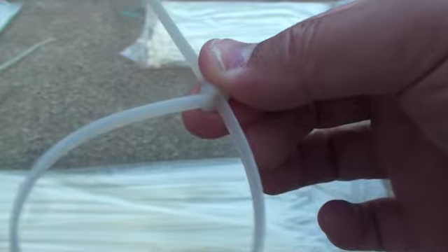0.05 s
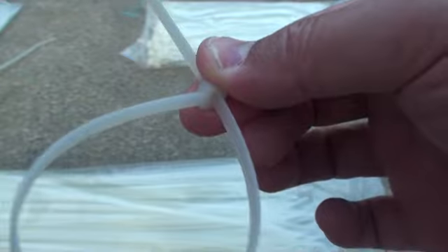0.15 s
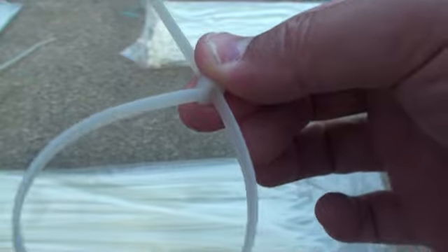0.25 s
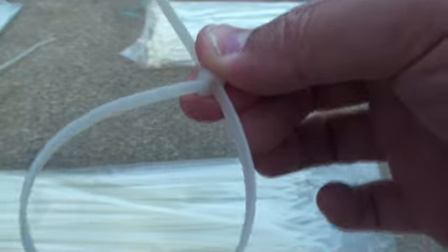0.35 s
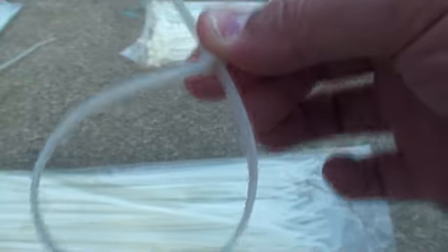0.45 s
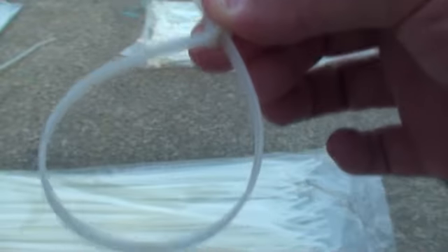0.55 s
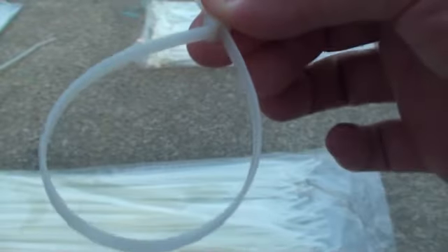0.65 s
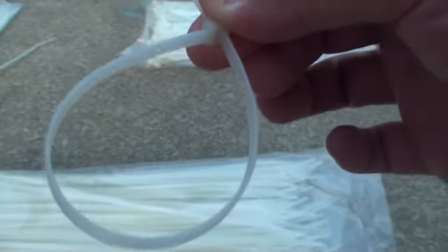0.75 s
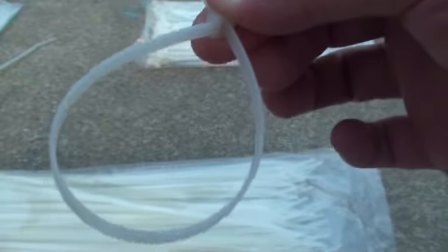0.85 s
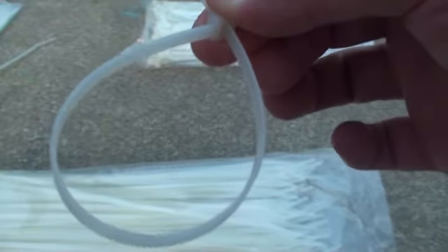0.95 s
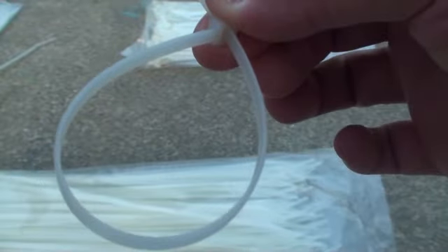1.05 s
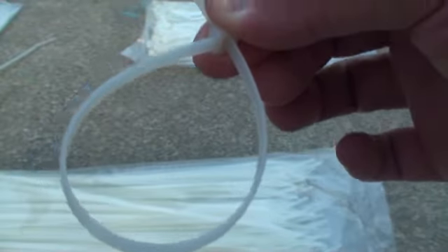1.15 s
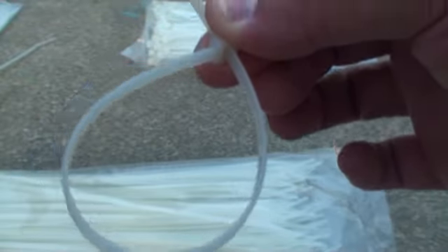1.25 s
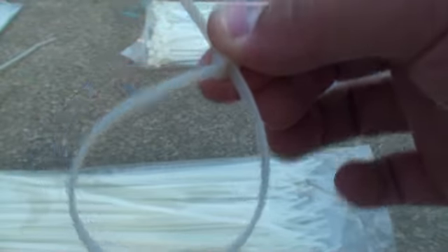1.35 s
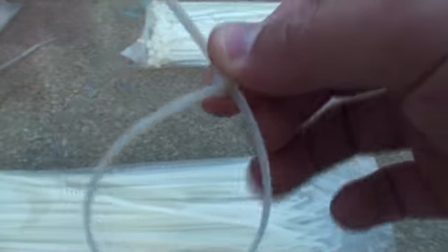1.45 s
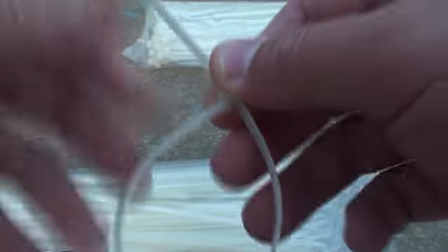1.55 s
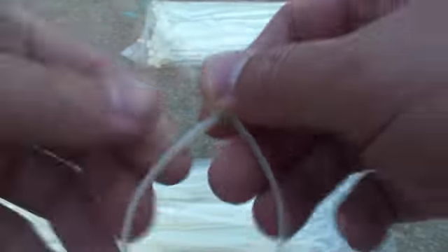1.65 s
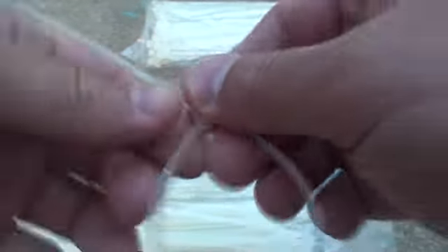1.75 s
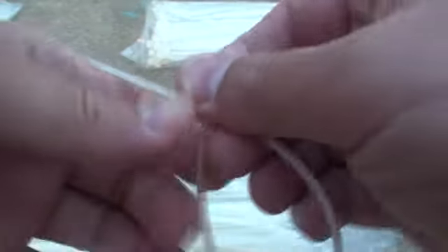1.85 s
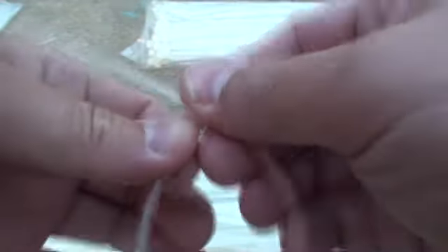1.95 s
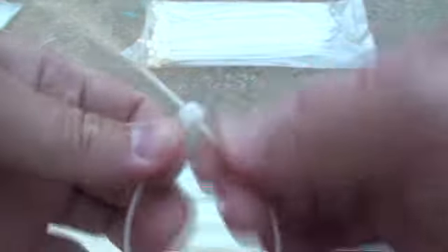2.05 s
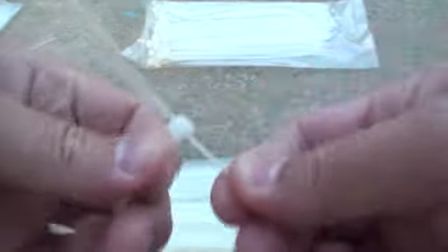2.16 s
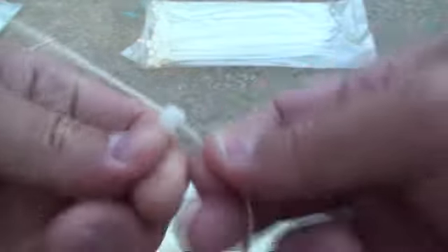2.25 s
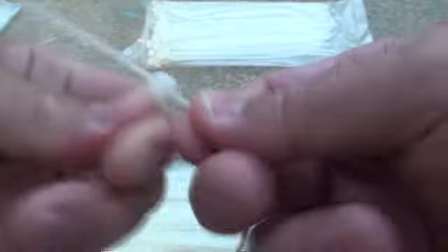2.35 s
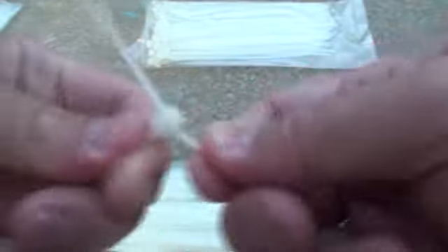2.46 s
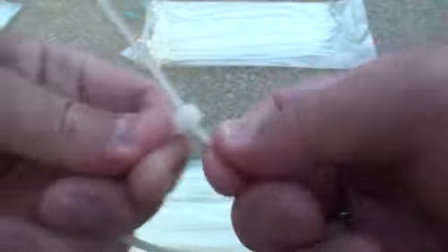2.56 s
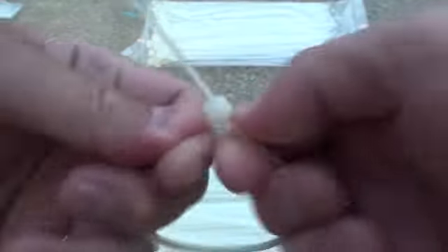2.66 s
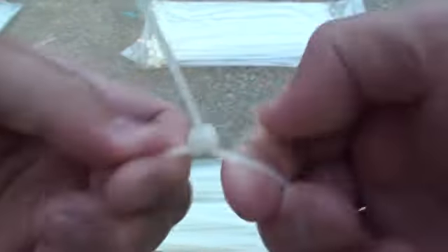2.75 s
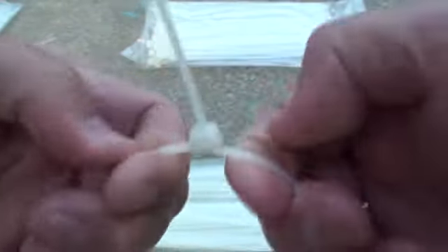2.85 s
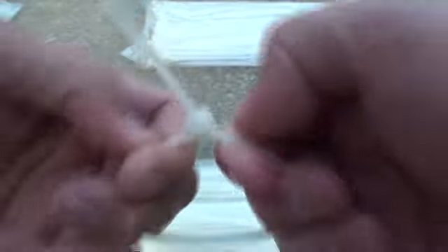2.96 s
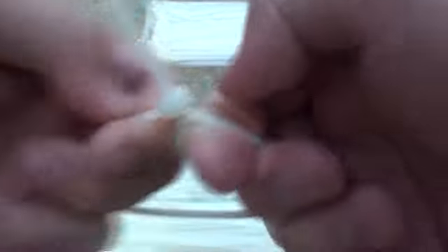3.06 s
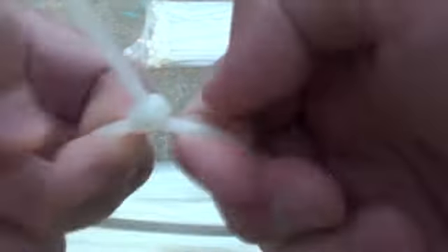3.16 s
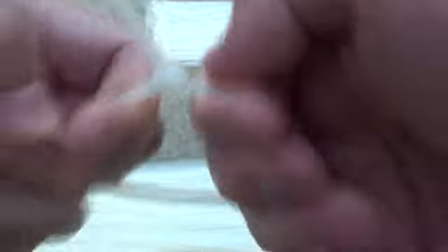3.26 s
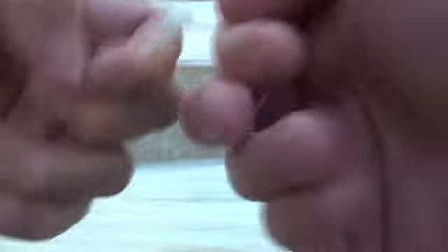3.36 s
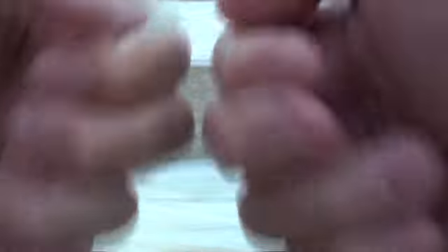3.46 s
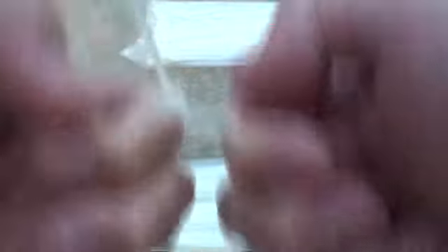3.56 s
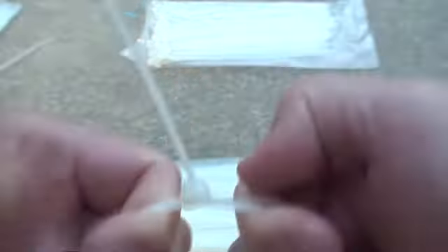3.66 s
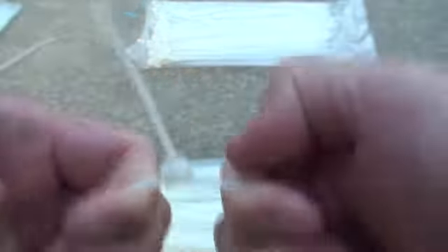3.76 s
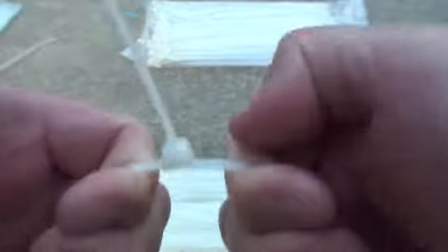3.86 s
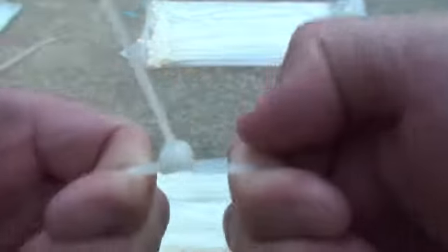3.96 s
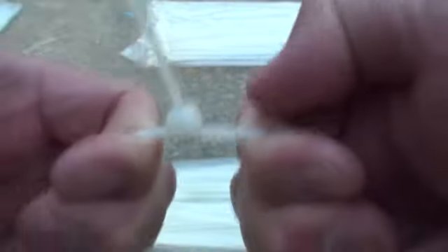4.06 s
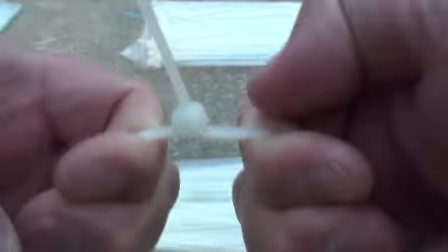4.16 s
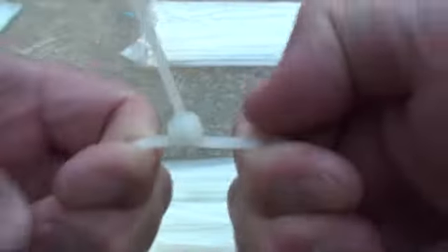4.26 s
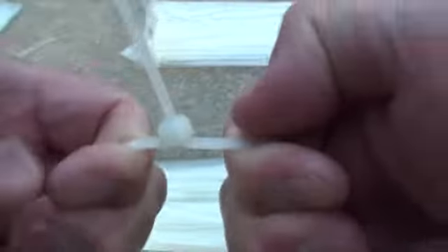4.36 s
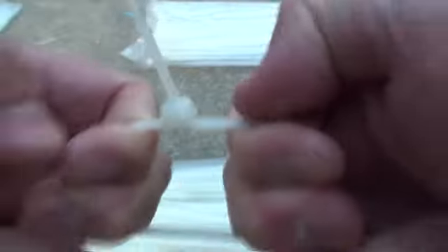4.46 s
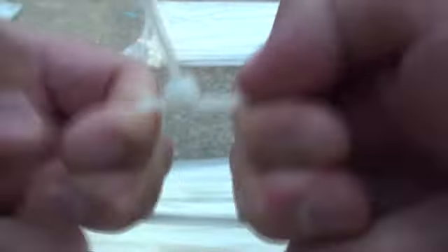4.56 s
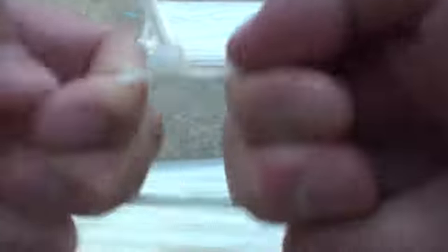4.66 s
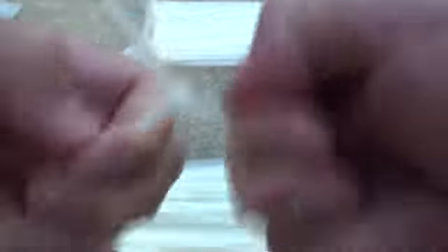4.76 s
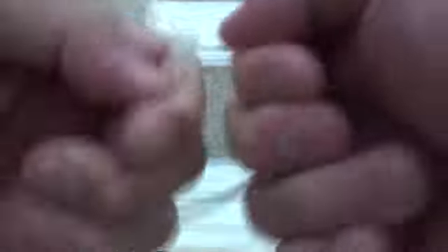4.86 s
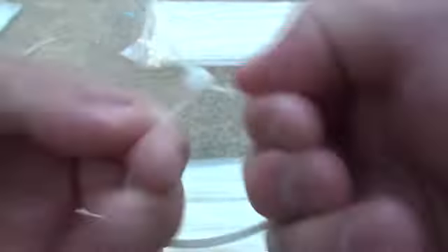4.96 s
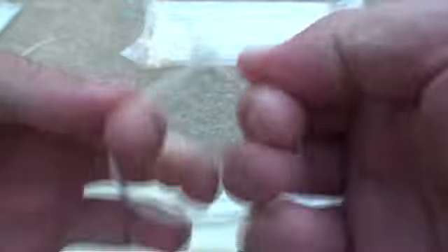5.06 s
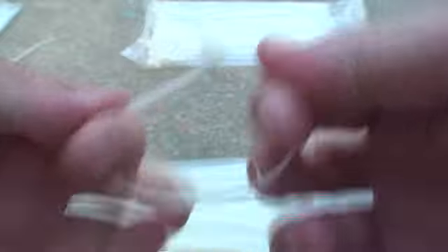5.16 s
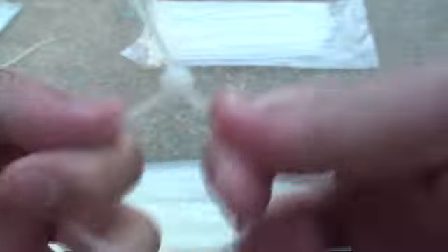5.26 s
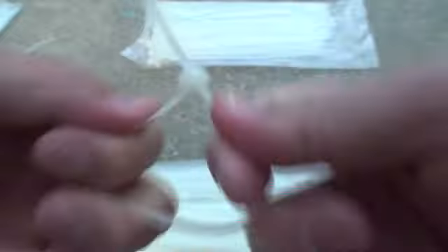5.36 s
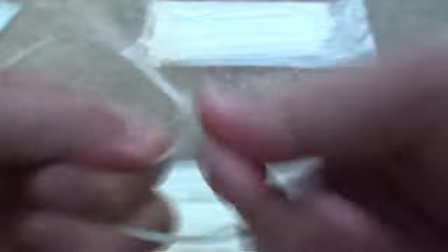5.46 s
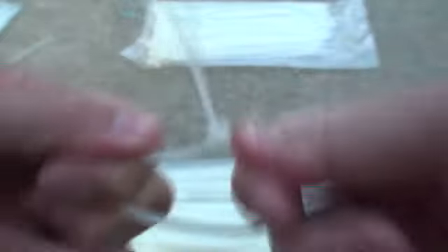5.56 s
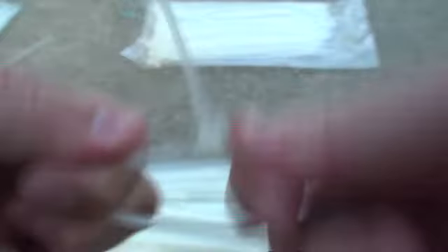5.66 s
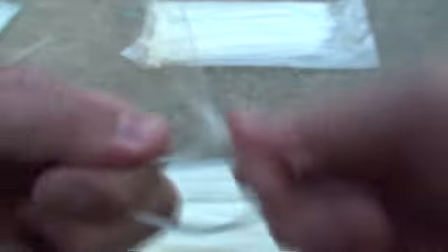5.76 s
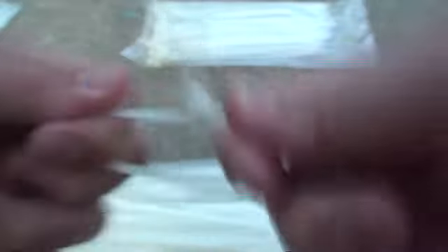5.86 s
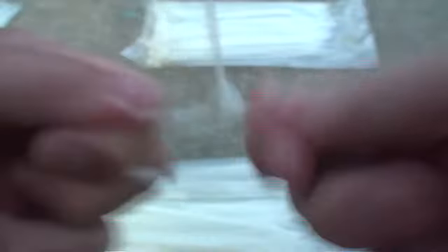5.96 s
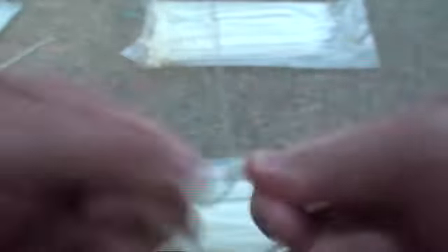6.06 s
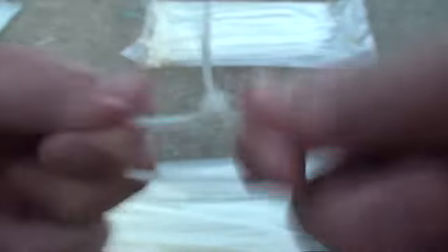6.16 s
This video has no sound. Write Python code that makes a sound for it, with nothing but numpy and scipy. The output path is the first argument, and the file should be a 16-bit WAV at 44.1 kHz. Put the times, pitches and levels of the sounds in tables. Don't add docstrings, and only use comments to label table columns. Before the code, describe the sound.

Sharp ratcheting clicks of a nylon strap dominate the first second and a half, each with a tiny rattle and a faint open-air tail. A final rapid burst comes after a gap. Then come quiet skin rustles, nail ticks, dull bumps and one bright click late on. Behind lie a steady low hum, soft traffic rumble, faint dove coos and thin bird whistles in a quiet yard, captured close in stereo.

```python
import sys
import numpy as np
from scipy import signal
from scipy.fft import rfft, irfft, next_fast_len
from scipy.io import wavfile
from scipy.ndimage import uniform_filter1d

SR = 44100
rng = np.random.default_rng(int(sys.argv[2]) if len(sys.argv) > 2 else 0)


def elevation(decibels):
    levels = np.asarray(decibels, float)
    return 10 ** (levels / 20)


def wav_record(signal):
    frames = np.transpose(np.atleast_2d(signal))
    bounded = np.clip(frames, -1, 1)
    quanta = np.round(bounded * 32767).astype(np.int16)
    wavfile.write(sys.argv[1], SR, quanta)


N = 273861
T = np.arange(N) / SR


def colour(points, size, stretch=1.):
    hz, db = np.transpose(points)
    bin_hz = np.maximum(np.arange(size // 2 + 1) * SR / size, 1)
    log_gain = np.interp(np.log(bin_hz), np.log(hz * stretch), db) * np.log(10) / 20
    cepstrum = irfft(log_gain, size)
    cepstrum[1:size // 2] *= 2
    cepstrum[size // 2 + 1:] = 0
    return np.exp(rfft(cepstrum))


def unit(x):
    return x / np.sqrt(np.mean(x ** 2))


def band(x, hz, width_hz):
    edges_hz = np.clip([hz - width_hz / 2, hz + width_hz / 2], 20, .45 * SR)
    return signal.sosfilt(signal.butter(2, edges_hz, "bandpass", fs=SR, output="sos"), x)


def walk(rate_hz, size=N):
    hold = int(SR / rate_hz)
    steps = np.repeat(rng.standard_normal(size // hold + 1), hold)
    return 1.6 * uniform_filter1d(uniform_filter1d(steps, hold), hold)[:size]


def fade(t60_s, size):
    return np.exp(-np.log(1000) * np.arange(size) / SR / t60_s)


def stereo(mid, side, side_db=0):
    return mid + elevation(side_db) * np.outer([1, -1], side)


def add(out, s, sound):
    i = int(round(s * SR))
    part = out[:, max(i, 0):i + sound.shape[-1]]
    part += sound[..., max(-i, 0):][..., :part.shape[-1]]


def teeth():
    # time_s, teeth_passed
    strap_travel = [
        [(-.0008, 0), (.0312, 2), (.048, 3), (.0684, 4), (.1137, 6), (.1873, 9), (.2141, 10), (.272, 12),
         (.3064, 13)],
        [(.4287, 0), (.4473, 1), (.4648, 2), (.4838, 3)],
        [(.8043, 0), (.8417, 1), (.8589, 2), (.9031, 5), (.9205, 6), (.9405, 7)],
        [(1.1333, 0), (1.1555, 1), (1.1893, 3)],
        [(1.3029, 0), (1.316, 1), (1.3527, 4), (1.3674, 5)],
        [(2.4112, 0), (2.4239, 2), (2.4372, 3), (2.4562, 5), (2.4667, 6), (2.4794, 7)],
    ]
    snaps = []
    for pull, path in enumerate(strap_travel):
        time_s, passed = np.transpose(path)
        for tooth in range(path[-1][1] + 1):
            snaps.append((pull, np.interp(tooth, passed, time_s)))
    return snaps


def ratchet():
    # tooth_peak_db, brightness_hz
    pull_settings = [(-4.8, 10050), (-4.9, 10170), (-4.2, 10500), (-4.7, 10180), (-4.7, 10140),
                     (-4.8, 9510)]
    # landing_ms, seating_ms, rebound_ms
    grip_blows_ms = [(.355, .47, .595), (.36, .47, .65), (.35, .528, .665), (.35, .52, .70),
                     (.355, .52, .66), (.14, .225, .37)]
    grip_blow_sizes = [(-1.0, -1.2, 1.0), (-.9, -1.6, -.7), (-.65, 1.2, -.55), (-1.0, 1.4, .6),
                       (-1.1, 1.5, -.6), (1.5, -.6, .3)]
    head_knocks_db = [1.5, 2, -2, -1.5, -1, -2]
    # freq_hz, level_db
    pawl_response = [(2500, -36), (4000, -38), (4800, -11.5), (5600, -7), (7500, -8), (9800, -1.5),
                     (12000, -1), (14000, -12), (15800, -13.5), (16900, -32)]
    # freq_hz, level_db
    pinched_response = [(2500, -34), (4000, -9), (5600, -15), (6800, -7), (8000, -2.5), (9800, 3),
                        (12000, 4.5), (14000, -10), (15800, -12), (16900, -27.5)]
    # freq_hz, level_db
    head_response = [(200, -44.5), (400, -16), (1000, -18), (1600, -17.5), (2300, -12.5), (3100, -19.5),
                     (4100, -16.5), (4800, -14.5), (6000, -31), (12000, -50)]
    # delay_ms, level_db
    palm_echoes = [(1.25, -36), (1.8, -10), (2.2, -9), (3.1, -22.5), (4.2, -27.5)]
    strap_db, strap_t60_s, strap_side_db = -24, 0.013, -10.5
    yard_db, yard_t60_s = -36.5, .16
    scatter_db, scatter_hz, scatter_ms = .7, 150, np.array([.006, .008, .025])

    out, size = np.zeros((2, N)), 4096
    phase_per_ms = -2j * np.pi * np.arange(size // 2 + 1) * SR / size / 1000
    rattles = rng.standard_normal((len(pull_settings), 2, size))
    onset = 1 - fade(0.0025, size)
    head = colour(head_response, size)
    for pull, s in teeth():
        chance = rng.standard_normal((3, 3))
        peak_db, bright_hz = pull_settings[pull] + chance[2, 1:] * (scatter_db, scatter_hz)
        blow_ms = grip_blows_ms[pull] + scatter_ms * chance[0]
        sizes = grip_blow_sizes[pull] * elevation(0.9 * chance[1])
        blows = 1 + sizes @ np.exp(np.outer(blow_ms, phase_per_ms))
        response = pinched_response if pull == len(pull_settings) - 1 else pawl_response
        pawl = colour(response, size, (bright_hz / 10000) ** 0.57)
        knock = elevation(head_knocks_db[pull] + 1.7 * chance[2, 0]) * np.exp(phase_per_ms * blow_ms[0]) * head

        path = np.zeros((2, size))
        path[:, 0] = elevation(3.0), elevation(1.5)
        for k, (ms, echo_db) in enumerate(palm_echoes):
            i = int(ms * SR / 1000)
            path[k % 2, i] += elevation(echo_db - 5)
            path[1 - k % 2, i + 1] += elevation(echo_db - 11.0)
        mid, side = 1.82 * rattles[pull] + 0.5 * rng.standard_normal((2, size))
        path += elevation(strap_db) * onset * fade(strap_t60_s, size) * stereo(mid, side, strap_side_db)
        yard = elevation(yard_db) * onset * fade(yard_t60_s, size) * rng.standard_normal((2, size))
        click = irfft((blows * pawl + knock) * rfft(path) + pawl * rfft(yard), size)
        add(out, s, click * elevation(peak_db - .2) / np.abs(click.mean(axis=0)).max())
    return out


def rubbing():
    # hardest_s, press_s, release_s, peak_db, tilt_db
    skin_strokes = [(1.86, 0.046, .16, -59, 0), (1.98, 0.12, .06, -58, 1.5), (2.086, .07, 0.014, -53.5, 3),
                    (2.2, 0.082, 0.067, -54.5, 1.5), (2.247, 0.092, 0.062, -45.5, -1),
                    (2.29, 0.057, 0.04, -60.5, 4), (2.502, 0.0065, 0.037, -49, 2),
                    (2.59, 0.25, .045, -58.5, 1.5), (2.8, 0.023, .12, -52, 0.5), (2.95, .03, .03, -64, -2),
                    (3.228, .08, .09, -66, -7), (3.49, 0.083, .07, -49, -1), (3.535, 0.052, 0.031, -46, 1),
                    (3.68, 0.18, .07, -55.5, -3.5), (3.926, 0.028, 0.064, -69, -10),
                    (4.99, .025, 0.22, -57, -1.5), (5.137, 0.024, .03, -57, 2.5),
                    (5.23, .05, .1, -53.5, 3.5), (5.3, 0.13, 0.03, -52, 1),
                    (5.636, 0.0067, 0.08, -50.5, 9.5), (5.69, .04, .035, -60, 5),
                    (6.006, 0.0069, 0.037, -47.5, -0.5), (6.045, .03, .015, -59, 4),
                    (6.16, .015, .05, -63, 4)]
    stroke_db, stroke_round = 17.5, 1.5
    dull_db, bright_db, focus = -1, 0, 0.16

    band_power = np.zeros((3, N))
    for s, press_s, release_s, peak_db, tilt_db in skin_strokes:
        away = np.where(T < s, (s - T) / press_s, (T - s) / release_s)
        db = peak_db - stroke_db * away ** stroke_round
        sink_db = focus * np.maximum(db + 73.5, 0)
        dull = db + dull_db - tilt_db - sink_db
        bright = db + bright_db + tilt_db - sink_db
        band_power += elevation([dull, db, bright]) ** 2
    grain_db = 2.0 * rng.exponential(size=N) + 1.8 * walk(150)
    grains = rng.standard_normal((2, N)) * elevation(grain_db)
    bands_hz = [(4600, 3000), (7500, 4200), (11200, 5600)]
    mid, side = sum(gain * unit(band(grains, *hz)) for gain, hz in zip(np.sqrt(band_power), bands_hz))
    low_pass = signal.ellip(6, .2, 50, 15600, fs=SR, output="sos")
    return signal.sosfilt(low_pass, stereo(mid, side, -20))


def ticking():
    # start_s, peak_db, centre_hz, width_hz, t60_ms
    nail_ticks = [(1.516, -40, 10600, 4000, 5.1), (1.974, -42, 4030, 5060, 20),
                  (2.077, -35, 5000, 8000, 26), (2.088, -36.5, 9000, 8000, 18),
                  (2.843, -38.5, 1800, 2000, 11), (2.909, -36, 4000, 5000, 5.5),
                  (3.049, -35, 1807, 3960, 6.4), (3.3452, -22, 3100, 4800, 4.8),
                  (3.347, -34.5, 4430, 6000, 17), (4.825, -36.5, 4970, 8800, 12),
                  (5.04, -43, 7000, 9000, 8), (5.269, -38.5, 8000, 8000, 25), (5.594, -42, 5000, 3000, 6.6),
                  (5.6136, -11, 12500, 6660, 17), (5.616, -27.5, 3520, 930, 6.9),
                  (5.615, -31, 8500, 2500, 8.6), (5.628, -29, 11400, 8000, 23),
                  (5.677, -28.5, 4100, 4070, 6.8), (6.005, -33, 2200, 3580, 24),
                  (6.017, -41, 5030, 7000, 18), (6.159, -39.5, 2500, 4000, 17),
                  (6.189, -42, 9000, 8000, 13)]
    out, size = np.zeros((2, N)), 2048
    for s, peak_db, hz, width_hz, t60_ms in nail_ticks:
        burst = rng.standard_normal((2, size)) * fade(t60_ms / 1000, size)
        mid, side = band(burst, hz, width_hz)
        add(out, s, elevation(peak_db) / np.abs(mid).max() * stereo(mid, side, -11))
    return out


def bumping():
    # start_s, peak_db, thud_hz, knock_hz, knock_db
    knuckle_bumps = [
        (5.4392, -32, 189, 1040, -0.5),
        (5.4625, -29, 181, 975, -3.5),
        (5.479, -37.5, 218, 900, 3.5),
    ]
    out, size = np.zeros((2, N)), 2048
    soft = 1 - fade(.002, size)
    for s, peak_db, thud_hz, knock_hz, knock_db in knuckle_bumps:
        thud = np.cos(2 * np.pi * thud_hz * T[:size]) * fade(0.036, size)
        knock = np.sin(2 * np.pi * knock_hz * T[:size]) * fade(0.01, size)
        add(out, s, elevation(peak_db + 1.0) * soft * (thud + elevation(knock_db) * knock))
    return out


def bird(notes, waver_hz, steady_hz, side_db, echo_db):
    out = np.zeros((1, N))
    for start_s, end_s, from_hz, to_hz, db in notes:
        size = int((end_s - start_s) * SR)
        glide_hz = from_hz + (to_hz - from_hz) * np.linspace(0, 1, size) ** .8
        phase = 2 * np.pi * np.cumsum(glide_hz) / SR
        flutter = steady_hz / waver_hz + walk(5 * waver_hz, size) + 1j * walk(5 * waver_hz, size)
        tone = unit(np.real(flutter * np.exp(1j * phase)))
        swell = np.sin(np.linspace(0, np.pi, size)) ** 0.18
        add(out, start_s, swell * elevation(db) * tone)
    echoes = elevation(echo_db) * rng.standard_normal((2, 6000)) * fade(0.3, 6000)
    mid, side = signal.fftconvolve(out, echoes, axes=1)[:, :N]
    return stereo(out + mid, side + out[0], side_db)


def songbird():
    # start_s, end_s, start_hz, end_hz, level_db
    husky_notes = [(2.6, 2.76, 2300, 2344, -69), (3.44, 3.56, 2390, 2290, -59.5),
                   (3.62, 3.74, 2590, 2700, -61.5), (3.84, 3.96, 2270, 2320, -67.5),
                   (4.29, 4.43, 2550, 2710, -64.5), (4.65, 4.77, 2456, 2610, -64.5),
                   (4.99, 5.17, 2614, 2670, -61.5), (5.2, 5.29, 2624, 2510, -62.5),
                   (5.79, 5.9, 2445, 2600, -65), (6.05, 6.15, 3140, 3000, -61)]
    # start_s, end_s, start_hz, end_hz, level_db
    clear_notes = [(2.75, 2.86, 3170, 3470, -68.5), (3.43, 3.55, 3524, 3600, -71.5),
                   (3.94, 3.99, 3000, 3520, -61.5), (3.98, 4.11, 3500, 3540, -71),
                   (4.36, 4.58, 3310, 3680, -70), (4.7, 4.92, 3170, 3700, -65.5),
                   (5.05, 5.2, 3055, 3500, -67), (5.46, 5.49, 3120, 3240, -58),
                   (5.5, 5.6, 3020, 3520, -62.5), (5.64, 5.73, 2990, 3070, -61),
                   (5.89, 6.06, 3363, 3290, -63)]
    return bird(husky_notes, 240, 10, -10, -30) + bird(clear_notes, 70, 10, -10, -30)


def dove():
    # start_s, end_s, start_hz, end_hz, level_db
    coo_notes = [
        (.24, .34, 535, 532, -60),
        (.36, .69, 535, 504, -58.5),
        (1.07, 1.23, 540, 531, -62),
        (3.1, 3.21, 550, 538, -54),
        (3.57, 3.68, 532, 492, -60.5),
    ]
    return bird(coo_notes, 20, 45, -18.5, -44)


def hum():
    hum_hz, width_hz, hum_db = 134.74, 10, -55
    level = elevation(hum_db + 2.0 * walk(1.5))
    return level * unit(band(rng.standard_normal(N), hum_hz, width_hz))


def air():
    # freq_hz, level_db
    air_response = [(12, -47.5), (20, -11.5), (105, -2), (136, -2.5), (166, -8.5), (275, -15.5), (375, -20),
                    (511, -22), (717, -24.5), (780, -22), (1920, -29.5), (2280, -30.5), (2620, -32),
                    (14600, -47), (16800, -66)]
    # freq_hz, side_minus_mid_db
    air_spread = [(60, -21), (160, -22.5), (300, -8), (600, -2.5), (1500, -1), (4000, -2.5), (9000, -3),
                  (14000, -61.5)]
    size = next_fast_len(N)
    mid, side = rfft(rng.standard_normal((2, size))) * colour(air_response, size)
    mid, side = irfft([mid, side * colour(air_spread, size)], size)[:, :N]
    level_db = -46 + .5 * walk(1.9)
    return elevation(level_db) / mid.std() * stereo(mid, side)


def microphone_hiss():
    # freq_hz, level_db
    hiss_response = [(4000, -30), (9000, -1.5), (11500, 7), (13000, -1), (15300, 0.5), (15800, 4),
                     (16100, -25), (17000, -38.5)]
    size = next_fast_len(N)
    hiss = irfft(rfft(rng.standard_normal((2, size))) * colour(hiss_response, size), size)[:, :N]
    return elevation(-74) * unit(hiss)


def scene():
    hands = ratchet() + rubbing() + ticking() + bumping()
    return hands + songbird() + dove() + hum() + air()


def band_limit(x):
    return signal.sosfilt(signal.butter(12, 17000, fs=SR, output="sos"), x)


def record(dry):
    low_pass = signal.ellip(8, .2, 70, 16500, fs=SR, output="sos")
    mix = signal.sosfilt(low_pass, dry + microphone_hiss())
    return band_limit(mix)


dry = scene()
out = record(dry)
wav_record(out)
```